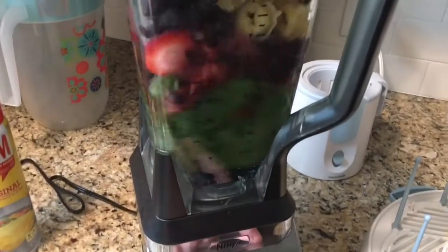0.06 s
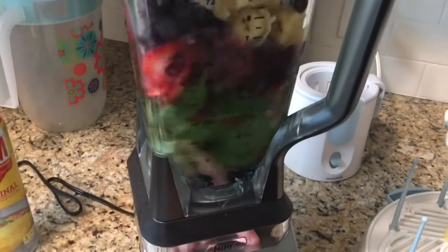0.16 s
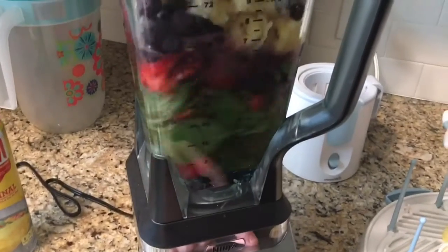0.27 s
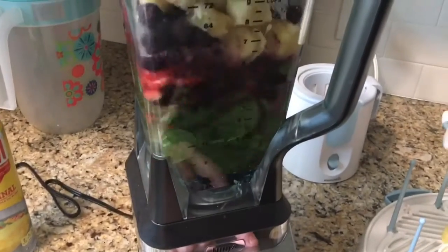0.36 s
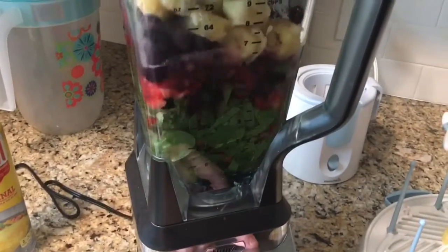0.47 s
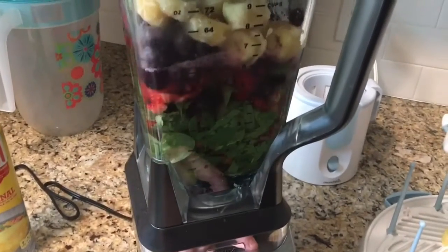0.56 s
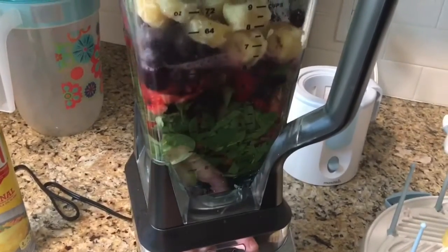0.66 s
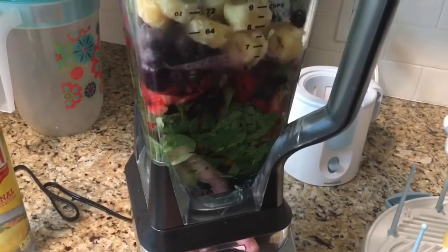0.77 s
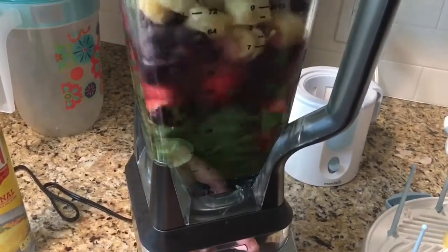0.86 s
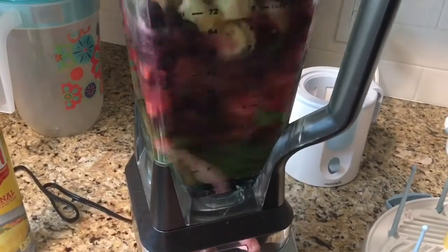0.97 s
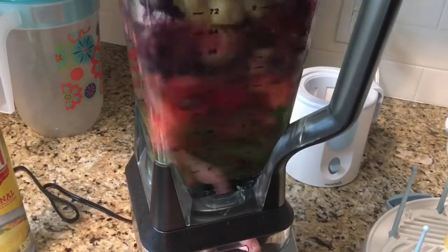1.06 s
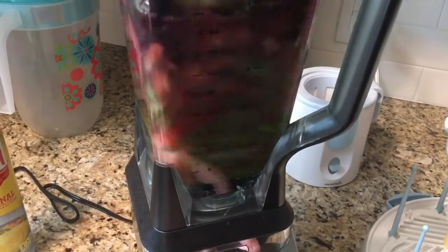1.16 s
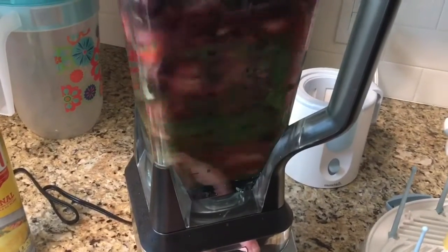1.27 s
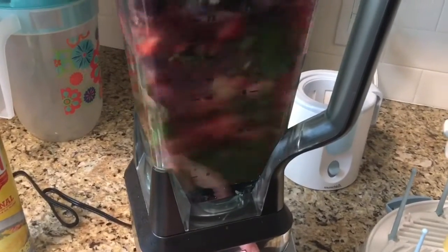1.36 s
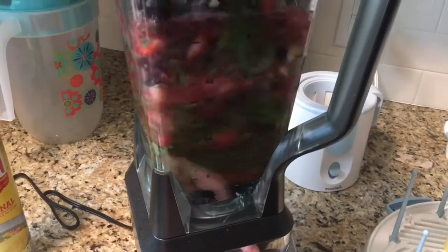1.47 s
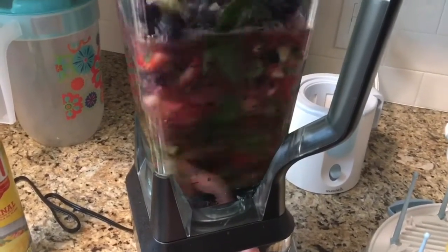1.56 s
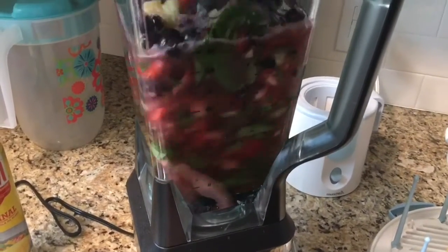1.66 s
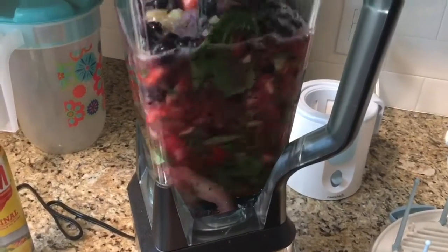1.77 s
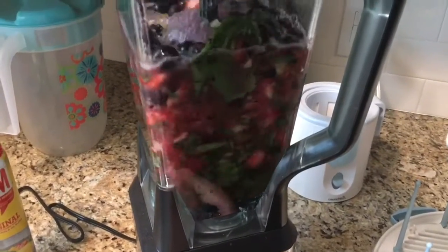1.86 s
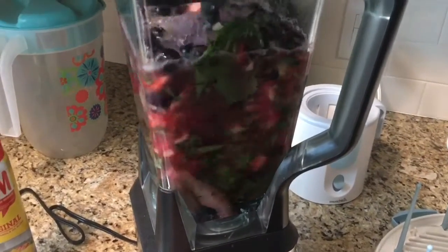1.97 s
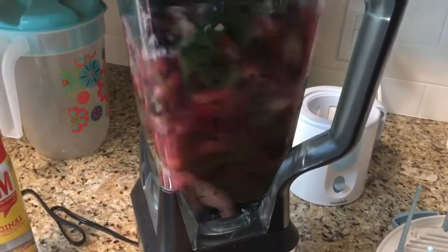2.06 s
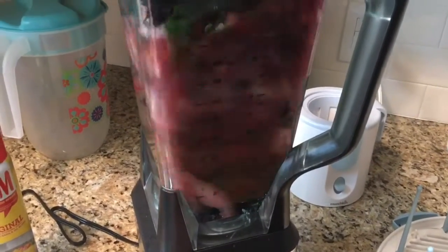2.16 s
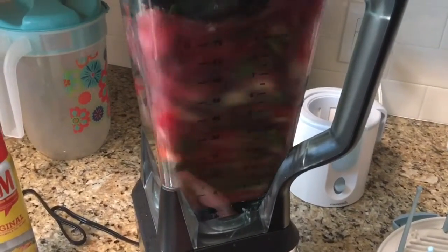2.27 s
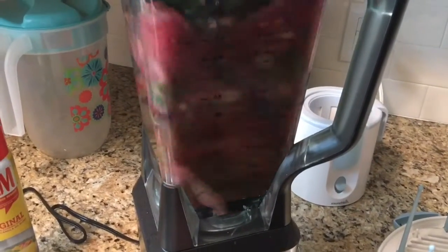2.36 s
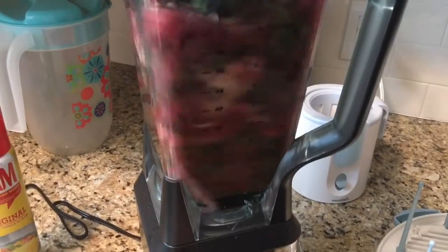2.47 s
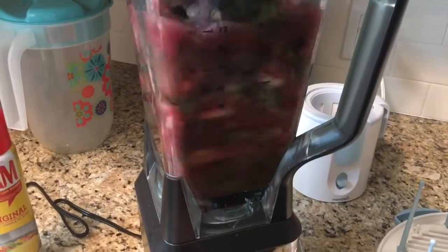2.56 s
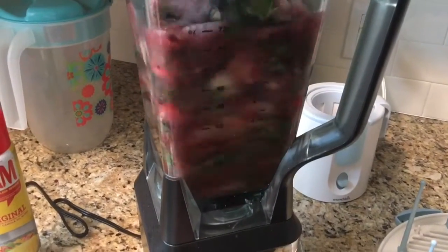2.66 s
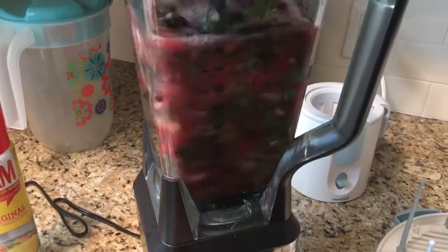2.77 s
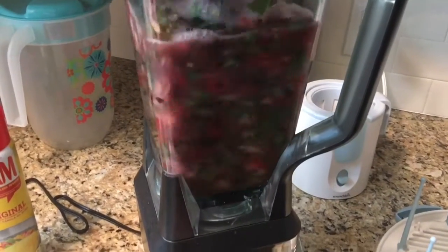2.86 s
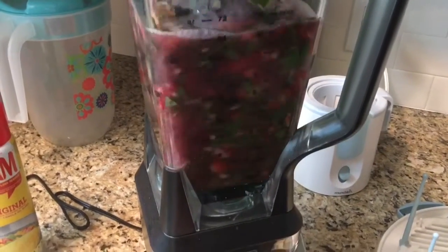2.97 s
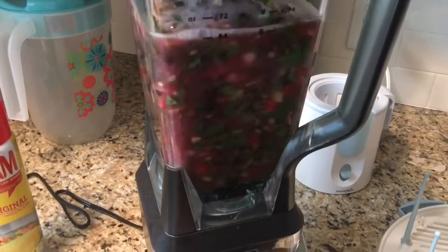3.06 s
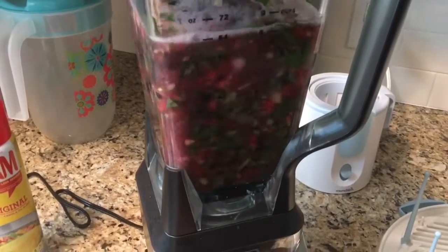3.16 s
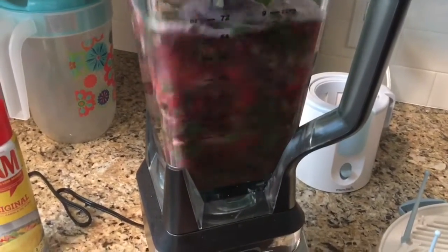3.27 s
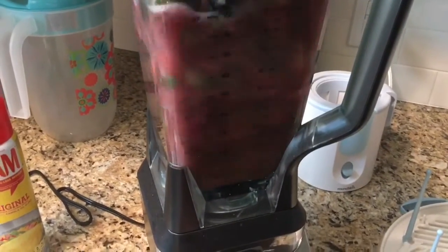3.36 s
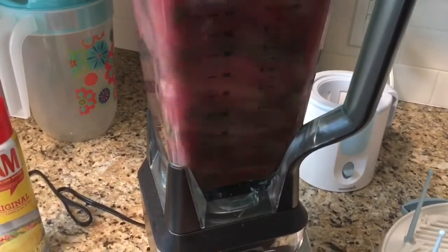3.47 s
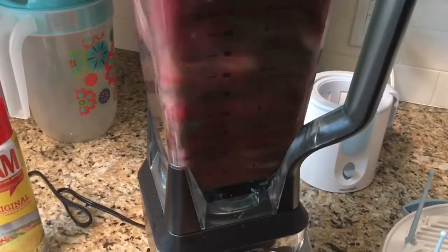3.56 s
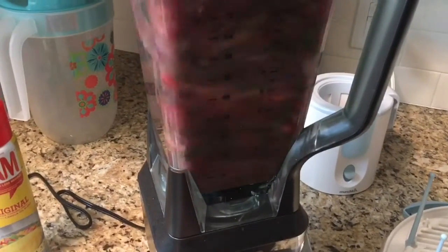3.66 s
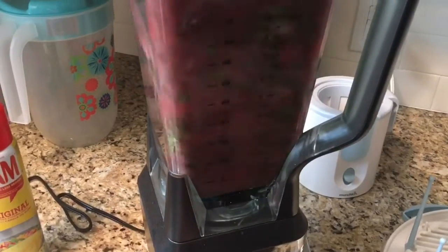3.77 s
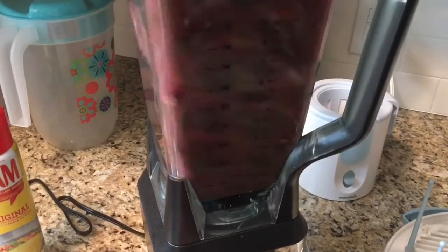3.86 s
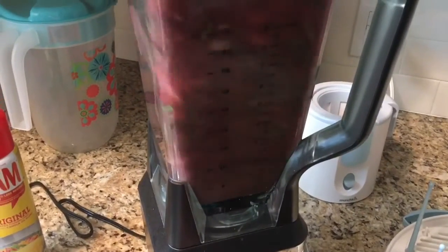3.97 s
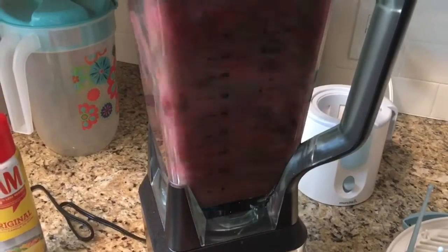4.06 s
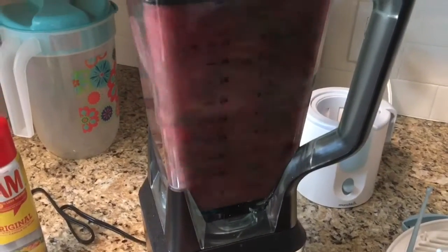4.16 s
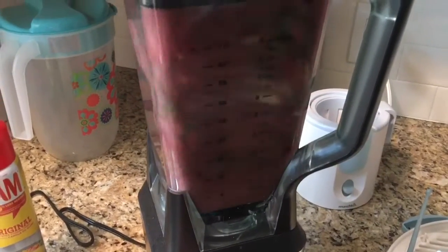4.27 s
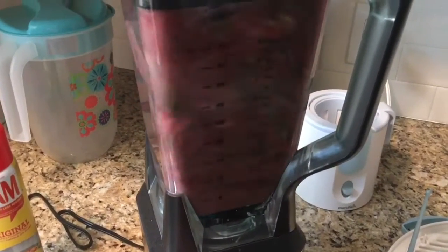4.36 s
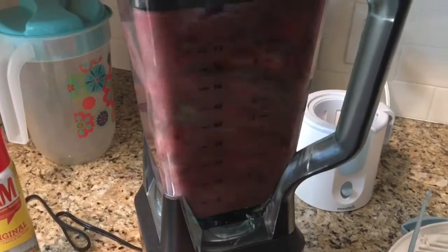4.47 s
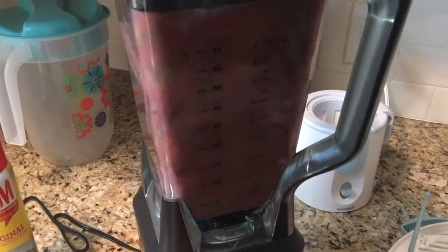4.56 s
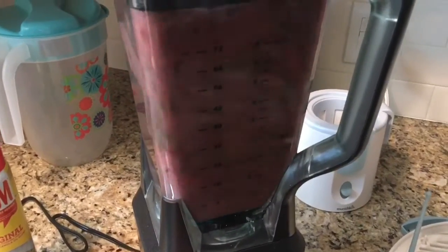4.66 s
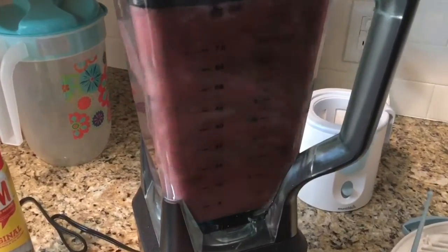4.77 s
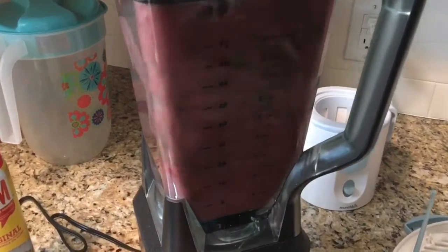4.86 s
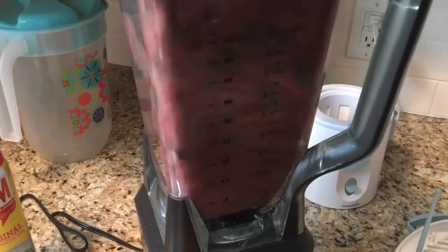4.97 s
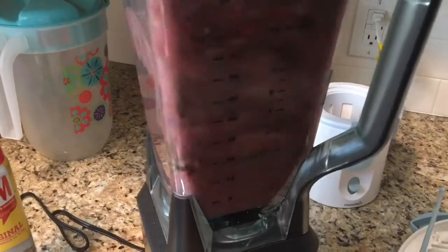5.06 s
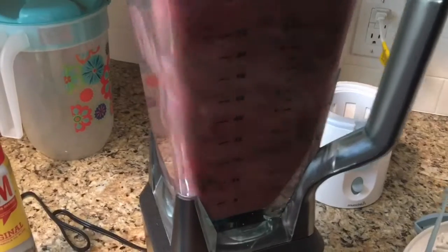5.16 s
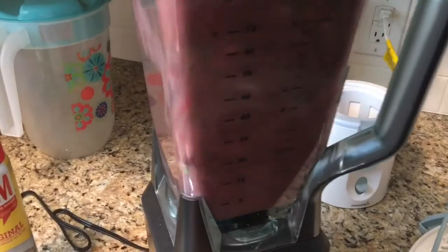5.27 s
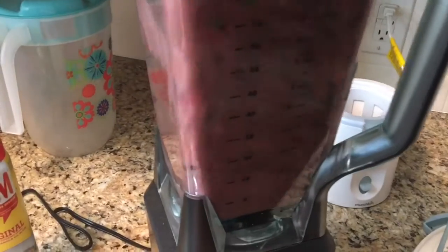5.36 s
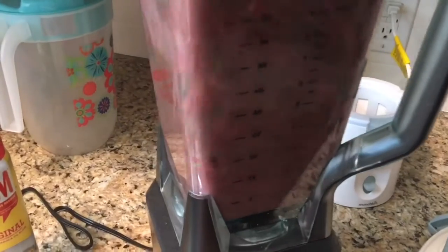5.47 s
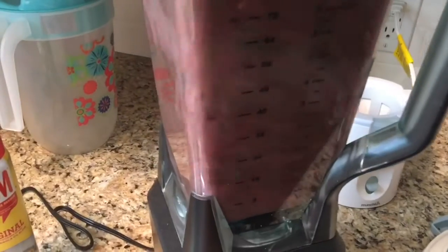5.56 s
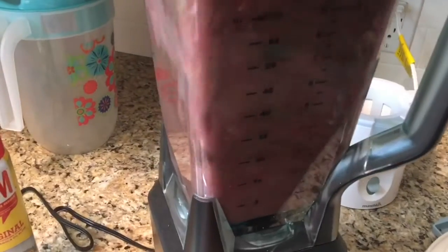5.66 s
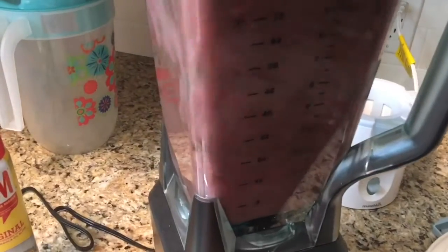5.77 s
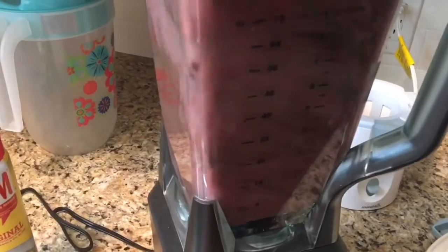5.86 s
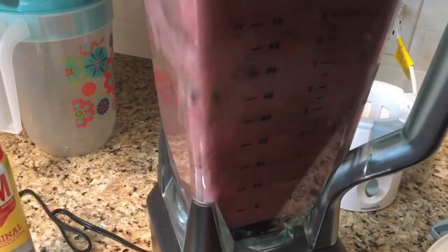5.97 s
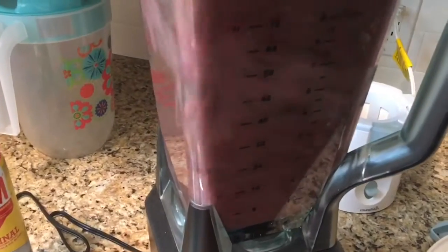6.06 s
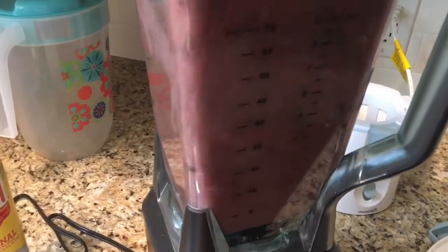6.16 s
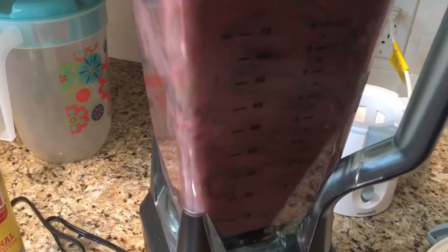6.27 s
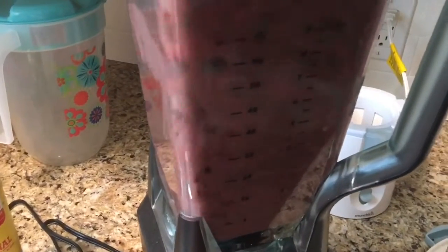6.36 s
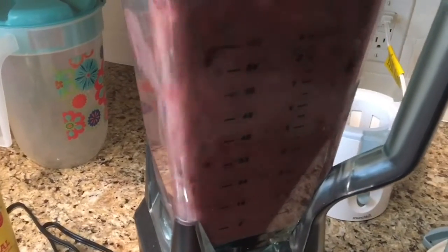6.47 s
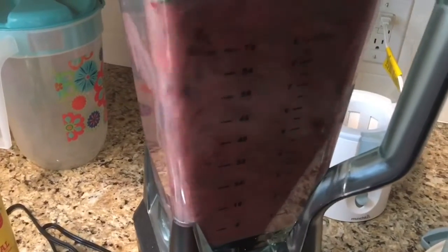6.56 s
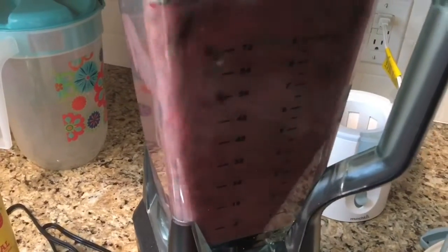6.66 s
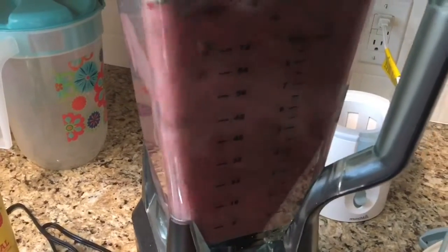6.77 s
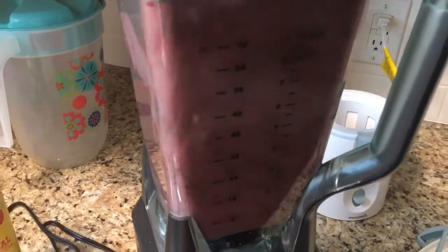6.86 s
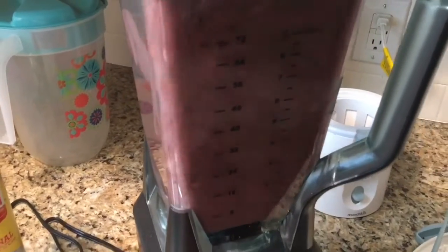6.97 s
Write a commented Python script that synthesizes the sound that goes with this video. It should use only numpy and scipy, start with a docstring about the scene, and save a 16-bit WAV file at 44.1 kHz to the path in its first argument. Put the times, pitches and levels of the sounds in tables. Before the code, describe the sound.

A countertop blender coasts down as hard fruit knocks against its plastic jar. The switch clicks before two more short pulses, each with rasping gears, chopping blades and fruit slumping wetly back. After a last click, the motor climbs into a steady high whine with rushing air and spray, and the pieces churn down to pulp. It is heard close by in a small kitchen, over a faint fridge hum.

```python
"""A countertop blender coasts down from a pulse as hard fruit knocks against the jar. The switch clicks ahead
of two more short pulses; each time the gears rasp, the blades chop and the fruit slumps back. After a last
click, at 3.2 s, the motor climbs into a steady run: the planetary gear whines through the ringing housing,
air and spray rush, and the pieces churn down to pulp. A fridge hums in the small kitchen throughout."""
import sys
import numpy as np
from scipy import signal
from scipy.fft import rfft, irfft, next_fast_len
from scipy.io import wavfile
from scipy.ndimage import uniform_filter1d, map_coordinates

SR = 44100
rng = np.random.default_rng(int(sys.argv[2]) if len(sys.argv) > 2 else 0)


def bounce(signal):
    """Save signal as a 16-bit WAV file at the path given by the first command-line argument."""
    frames = np.transpose(np.atleast_2d(signal))
    limited = np.clip(frames, -1, 1)
    pcm = np.round(limited * 32767).astype(np.int16)
    wavfile.write(sys.argv[1], SR, pcm)


N = 309132
T = np.arange(N) / SR
RUN_START_S = 3.212

# Presses of the pulse button. Each row: on and off in seconds, braking by the fruit in Hz,
# starting surge in dB, then trims of chop, churn and rush in dB.
PULSES = [(-.25, -.11, 9.7, 28, 0, -1, 1), (.842, 1.035, 6.9, 10.5, -0.5, -1, 0),
          (1.993, 2.14, 6.05, 9.5, -1, -1, 0.5)]
# Whole pieces left in the jar. Each row: time in seconds, share from 0 to 1.
WHOLE_PIECES = [(0, 0.86), (2, 0.94), (3.3, 0.97), (4, 0.26), (4.8, 0.17), (7, 0)]
# Tone of the midrange chop and of the low churn. Each row: frequency in Hz, level in dB.
CHOP_EQ = [(150, -27.5), (400, -4), (600, 5.5), (850, 0.5), (1150, 4.5), (1400, 4), (2000, 0), (2800, -9.5),
           (3600, -4), (6000, -16), (15000, -84)]
CHURN_EQ = [(25, -27), (45, -9), (70, -13), (107, -1.5), (150, -12.5), (205, -0.5), (280, -1), (330, 1),
            (358, 2.5), (390, -2.5), (440, 0.5), (530, -9), (900, -18.5), (3000, -55)]


def shaft():
    """Turns per second: each pulse spins up, then coasts against drag and fruit; the run climbs."""
    # The motor catches, ramps up, the fruit thins. Each row: added speed in Hz, time constant in seconds.
    run_stages = [(13.12, .018), (29.55, .209), (10.26, 1.5)]
    pulse_hz, spin_up_s, coast_s = 45, .07, .463
    speed = np.zeros(N)
    for on, off, brake, *_ in PULSES:
        driven = pulse_hz * (1 - np.exp(-np.clip(T - on, 0, off - on) / spin_up_s))
        drag = np.exp(-np.maximum(T - off, 0) / coast_s)
        speed += np.maximum((driven + brake) * drag - brake, 0)
    age = np.maximum(T - RUN_START_S, 0)
    speed += sum(hz * (1 - np.exp(-age / lag)) for hz, lag in run_stages)
    return np.maximum(speed * (1 + .0015 * wander(T * 5)), 1e-3)  # the load makes the speed waver


def gear_whine(speed, turns):
    """Tones of shaft, gear mesh and motor lock to the rotation and sweep through the housing resonances."""
    orders = [1, 2, 7, 46, 47, 48, 89, 90, 91, 94, 97, 98, 99, 100, 101, 103, 135, 138, 141, 144, 147, 186,
              194, 195, 231, 235, 63.67, 127.34, 152.8]  # Each entry: a tone's cycles per blade turn.
    levels_db = [-46.5, -49, -36, -38.5, -55, -36.5, -47, -47, -58, -35, -39.5, -50, -44.5, -41, -45.5,
                 -46.5, -43, -44.5, -45, -50, -41, -50, -58, -46, -60, -56, -56, -59, -42.5]  # Each entry: that tone's level in dB.
    shaky = turns + 0.00088 * wander(T * 35)  # each cut checks the shaft a little
    shaky += 0.00055 * wander(T * 320)  # play between the teeth blurs the high tones
    whine = 0
    for order, db in zip(orders, levels_db):
        gain = undb(db + housing_db(order * speed) + 3.3 * wander(T * 20))
        whine += gain * np.sqrt(2) * np.sin(2 * np.pi * order * shaky)
    drive_db = np.where(T < RUN_START_S, -2, 4)  # a clean whine needs a steady drive
    return undb(drive_db) * whine * (speed / speed.max()) ** 2.35


def gear_rasp(speed, turns):
    """Whole pieces load the teeth unevenly, spreading a rasp around each harmonic of the mesh."""
    harmonics_db = [-27.5, -33, -29.5, -33.5, -36]  # Each entry: level of one mesh harmonic in dB.
    ring_teeth, pulp_db, chunky_db, coast_db = 47, -5, 3.5, -1.5
    chunky = np.interp(T, *np.transpose(WHOLE_PIECES))
    jolted = turns + 0.0037 * chunky * wander(turns * 9)  # pieces jolt the shaft and smear the mesh
    rasp = 0
    for k, db in enumerate(harmonics_db, 1):
        mesh = 2 * np.pi * k * ring_teeth * jolted
        uneven = turns * (4.5 + 2 * k)
        band = wander(uneven) * np.cos(mesh) + wander(uneven) * np.sin(mesh)
        hz = k * ring_teeth * speed
        radiated = hz ** 4 / (hz ** 4 + 700 ** 4)  # the small housing radiates little bass
        hardness = (speed / speed.max()) ** (0.18 * k)  # slow teeth meet softly: the top fades first
        rasp += radiated * hardness * undb(db + 0.65 * housing_db(hz)) * band
    powered = (T >= RUN_START_S) + sum((T >= on) * (T < off) for on, off, *_ in PULSES)
    coasting = 1 - uniform_filter1d(1. * powered, size=SR // 5)  # motor off: less force on the teeth
    return undb(pulp_db + (chunky_db - pulp_db) * chunky + coast_db * coasting) * rasp


def gears(speed, turns):
    """The planetary gear whines and rasps, falling silent as the shaft coasts to rest."""
    drive = (speed / speed.max()) ** 0.23 * np.clip((speed - 3) / 14, 0, 1)
    return drive * (gear_whine(speed, turns) + gear_rasp(speed, turns))


def blades(speed, turns):
    """Blades cut pieces, churn pulp and fling spray; the cuts get finer and more even as pieces shrink."""
    # Tone of wet pulp and of rushing air and spray. Each row: frequency in Hz, level in dB.
    pulp_eq = [(150, -23.5), (400, -23.5), (650, -0.5), (830, -9), (1030, 0), (1160, -6.5), (1680, -1.5),
               (2150, 2.5), (2450, 3), (3050, -6), (3600, -16.5), (6000, -23.5), (15000, -41)]
    rush_eq = [(1200, -37.5), (2800, 0.5), (3400, -0.5), (4300, 2), (4900, -1), (5600, 3), (6500, -2),
               (7800, -4), (9500, -6.5), (10400, -13.5), (11800, -13), (16000, -21.5)]
    chop_gain, churn_gain, rush_gain = blade_gains(speed)
    chunky = np.interp(T, *np.transpose(WHOLE_PIECES))
    bite_db = (0.27 + 1.09 * chunky) * wander(turns * 3.5)  # each passing blade meets a different load
    cuts = grains(300 + 55 * speed, spread_db=3.5) * undb(1.85 * bite_db)
    spray = grains(800 + 120 * speed, spread_db=4.0) * undb(3.15 * bite_db)
    pieces = colour(cuts + 0.77 * rng.standard_normal(N), CHOP_EQ, housing=0.42)
    pulp = colour(spray + 0.53 * rng.standard_normal(N), pulp_eq, housing=0.52)
    chop = np.sqrt(chunky) * pieces + np.sqrt(1 - chunky) * pulp
    churn = colour(grains(1500 + 20 * speed, spread_db=2.0) * undb(2 * bite_db), CHURN_EQ)
    rush = colour(0.54 * cuts + 0.51 * spray + 0.82 * rng.standard_normal(N), rush_eq, housing=0.53)
    return chop_gain * chop + churn_gain * churn + rush_gain * rush


def blade_gains(speed):
    """Chop, churn and rush grow with speed, surge on biting settled fruit and die as the blades stall."""
    # How each layer follows the shaft. Each lists: base level in dB, dB per doubling of speed,
    # stall speed in Hz, weight of the surge.
    chop = (-21.5, 1.9, 6, 1.0)
    churn = (-22, 3, 5, 1.37)
    rush = (-19.5, 5.5, 9, 0.39)
    full_hz, run_surge_db, surge_s = 52, 7.5, .12
    surge_db, trims_db = np.zeros(N), np.zeros((3, N))
    for on, _, _, start_db, *trims in PULSES + [(RUN_START_S, None, None, run_surge_db, 0, 0, 0)]:
        since = T >= on
        surge_db[since] = start_db * np.exp(-(T[since] - on) / surge_s)
        trims_db[:, since] = np.array(trims)[:, None]
    doublings = np.log2(speed / full_hz)
    return [undb(db + slope * doublings + weight * surge_db + trim) / (1 + (stall / speed) ** 2)
            for (db, slope, stall, weight), trim in zip((chop, churn, rush), trims_db)]


def knocks():
    """Hard fruit cracks against a blade and thuds into the plastic jar, which rings briefly."""
    # Blade hits. Each row: start in seconds, thud in dB, crack in dB, decay in seconds.
    hits = [(0.065, -16, -7.5, 0.0038), (0.075, -37, -9.5, 0.006), (0.1347, -25, -4, 0.0024),
            (0.204, -27, -13, .004), (0.279, -16, -18, 0.005), (0.358, -25, -21, 0.0058),
            (0.844, -25, -30, 0.0071), (0.87, -26, -11.5, 0.0046), (0.9243, -9, -7.5, 0.0047),
            (0.964, -26, -10, 0.013), (1.033, -7, -10, 0.0042), (1.1139, -21, -16, 0.0028),
            (1.133, -11.5, -30, 0.0041), (1.294, -16, -11, 0.0029), (1.315, -10, -9, 0.0038),
            (1.394, -8.5, -34, .003), (1.427, -20, -22, 0.013), (1.808, -35, -39, 0.02),
            (1.995, -30, -31, .008), (2.035, -11, -12, 0.0059), (2.0946, -8, -9.5, 0.0067),
            (2.123, -21, -10, 0.0046), (2.209, -13.5, -15.5, 0.016), (2.24, -26, -23, .005),
            (2.773, -47, -33, 0.011), (2.85, -36, -41, .008), (3.217, -11.5, -16.5, 0.0085),
            (3.319, -14, -10, .007), (3.357, -19, -11.5, 0.0095), (3.433, -13, -8, .004),
            (3.584, -7, -20, 0.007), (3.639, -10, -26, 0.0036), (3.684, -13, -7, .004),
            (3.747, -8, -13, 0.0098), (3.873, -7.5, -25, .005), (3.96, -10, -21, 0.0054),
            (3.99, -9, -11, .004), (4.081, -6, -27, 0.0051), (4.59, -6, -10, .004),
            (5.214, -7.5, -25, 0.0068), (5.364, -10.5, -25, 0.0053)]
    # Tone of the thud and of the crack. Each row: frequency in Hz, level in dB.
    thud_eq = [(80, -6), (300, -7), (800, -5.5), (1400, -1.5), (2300, -2.5), (2900, -8.5), (5000, -16),
               (16000, -69)]
    crack_eq = [(300, -12), (1200, 3), (2400, 5), (4000, 7), (6300, 1.5), (8500, -0.5), (11000, -7),
                (16000, -26)]
    thud = crack = 0
    for start, thud_db, crack_db, decay in hits:
        # body, first snap and tail
        blow = 0.65 * burst(start, decay) + 0.42 * burst(start, 0.00053) + 0.085 * burst(start, 0.016)
        thud += undb(thud_db) * blow
        crack += undb(crack_db) * blow
    thud *= colour(rng.standard_normal(N), thud_eq, housing=0.2)
    crack *= colour(rng.standard_normal(N), crack_eq, housing=0.25)
    return thud + crack


def slumps():
    """Fruit falls back on the slowing blades in a soft swell: a low slosh and a wet spatter."""
    # Falling fruit. Each row: peak time and width in seconds, slosh in dB, splash in dB.
    falls = [(0.137, 0.032, -21.5, -33), (0.363, 0.029, -42, -34), (1.646, 0.034, -47, -38),
             (2.236, 0.021, -24, -36), (2.595, .025, -31, -32), (2.744, .03, -45, -41),
             (2.892, 0.024, -38, -48)]
    slosh = splash = 0
    for peak, width, slosh_db, splash_db in falls:
        swell = np.exp(-.5 * ((T - peak) / width) ** 2)
        slosh += undb(slosh_db) * swell
        splash += undb(splash_db) * swell
    slosh *= colour(grains(1500, spread_db=1.5), CHURN_EQ)
    splash *= colour(grains(460, spread_db=5.0), CHOP_EQ, housing=0.94)
    return slosh + splash


def plops():
    """Air pockets open in the fruit and ring for a few cycles, bending up a little."""
    # Air pockets. Each row: start in seconds, pitch in Hz, level in dB, decay in seconds.
    pockets = [(1.134, 1570, -21, .007), (1.393, 1500, -13, .005), (2.248, 477, -14, 0.0085),
               (2.699, 930, -21.5, 0.013), (2.751, 1080, -25, .012), (3.577, 1382, -8.5, .008),
               (4.082, 1130, -15, 0.0042)]
    rise_per_s = 3
    out = 0
    for start, hz, db, decay in pockets:
        age = np.clip(T - start, 0, .1)
        cycles = hz * age * (1 + rise_per_s * age / 2)
        out += undb(db) * burst(start, decay) * np.sin(2 * np.pi * cycles)
    return out


def switch():
    """Each click is a short crack that rings the control panel."""
    # Switch clicks. Each row: start in seconds, level in dB, panel ring relative to it in dB.
    clicks = [(0.7256, -35.5, -5.5), (.789, -35.5, -25), (1.8805, -35.5, -6.5), (1.94, -36, -25),
              (3.046, -55, -7), (3.093, -25.5, -18), (3.159, -36, -15)]
    # Tone of the crack. Each row: frequency in Hz, level in dB.
    click_eq = [(200, 6), (700, -13), (1200, 7), (2800, 4), (4200, 0), (6500, 0.5), (9000, -7.5),
                (16000, -24)]
    # Panel modes. Each row: frequency in Hz, level in dB, seconds to fall by 60 dB.
    panel_modes = [(440, 0, 0.14), (1036, 17.5, 0.041), (1320, 17, 0.044), (2060, -1, 0.043),
                   (2220, 5, 0.065), (5960, -6, .051)]
    crack = sum(undb(db) * burst(start, 0.011) for start, db, _ in clicks)
    crack *= colour(rng.standard_normal(N), click_eq, housing=0.33)
    blows = np.zeros(N)
    for start, db, ring_db in clicks:
        blows[int(start * SR)] = undb(db + ring_db)
    t = T[:SR // 4]
    ring = sum(undb(db - 60 * t / t60) * np.sin(2 * np.pi * hz * t) for hz, db, t60 in panel_modes)
    return crack + 0.75 * signal.fftconvolve(blows, ring)[:N]


def room(x, t60, wet_db):
    """Tiles and counter return a short diffuse tail."""
    t = T[:SR // 2]
    tail = rng.standard_normal(len(t)) * undb(-60 * t / t60) * (t > .003)
    return x + undb(wet_db) * signal.fftconvolve(x, tail / np.linalg.norm(tail))[:N]


def kitchen():
    """The fridge hums over quiet room tone."""
    # Fridge partials and the room tone's spectrum. Each row: frequency in Hz, level in dB.
    partials = [(59.2, -66), (118.4, -54), (236.9, -56), (296.1, -70)]
    room_eq = [(15, -30), (25, -1), (75, 3), (167, -21), (224, -5), (438, -9), (604, -12.5), (811, -18),
               (879, -19.5), (2020, -27.5), (2630, -32), (15000, -48)]
    hum = sum(undb(db) * np.sqrt(2) * np.sin(2 * np.pi * (hz * T + rng.random())) for hz, db in partials)
    return undb(-1.5) * hum + undb(-44) * colour(rng.standard_normal(N), room_eq)


def housing_db(hz):
    """Boost or cut that the resonant motor housing gives a frequency."""
    # Housing resonances. Each row: centre in Hz, width in Hz, gain in dB.
    resonances = [(842, 220, 15.5), (1294, 63, 7), (1510, 51, 6.5), (1950, 61, 4.5), (2090, 40, 7),
                  (2420, 43, 5), (3440, 410, 7), (4210, 114, 7.5), (4537, 53, 9.5), (5067, 51, 10),
                  (5160, 103, 10.5), (6080, 150, 13), (6543, 75, 8.5), (6674, 140, 11), (8480, 380, 6.5),
                  (10050, 180, -6)]
    return sum(db / (1 + (2 * (hz - centre) / width) ** 2) for centre, width, db in resonances)


def colour(x, eq, housing=0):
    """Minimum-phase filter from an EQ curve and a share of the housing resonances; output at rms 1."""
    size = 2 * next_fast_len(N // 2 + 4096)
    hz = np.arange(size // 2 + 1) * SR / size
    eq_hz, eq_db = np.transpose(eq)
    gain_db = np.interp(np.log(hz + 1), np.log(eq_hz), eq_db) + housing * housing_db(hz)
    cepstrum = irfft(np.log(undb(gain_db)))[:size // 2]
    response = np.exp(rfft(2 * cepstrum, size))
    return unit(irfft(rfft(x, size) * response)[:N])


def grains(per_s, spread_db):
    """Random tiny impacts, a few much larger than the rest."""
    sizes = undb(spread_db * np.minimum(rng.exponential(size=N), 4))
    return unit((rng.random(N) < per_s / SR) * sizes * rng.choice([-1, 1], N))


def burst(start, decay):
    """Envelope of a blow: instant attack, exponential fall."""
    age = np.maximum(T - start, 0)
    return (age > 0) * np.exp(-np.minimum(age / decay, 50))


def wander(position):
    """Smooth random drift of spread near 1, with a new value at each whole step of position."""
    steps = rng.standard_normal(int(position.max()) + 2)
    return map_coordinates(steps, [position], order=2, mode="nearest")


def undb(db):
    """Decibels to gain."""
    return 10 ** (np.asarray(db) / 20)


def unit(x):
    """Scale to rms 1."""
    return x / np.sqrt(np.mean(x ** 2))


def scene():
    """One shaft drives gears and blades; jar and switch get the reverb; both channels are alike."""
    speed = shaft()
    turns = np.cumsum(speed) / SR
    gearbox = gears(speed, turns)
    jar = blades(speed, turns) + slumps() + plops() + knocks()
    mono = gearbox + room(jar + switch(), t60=0.3, wet_db=-13.0) + kitchen()
    return np.array([mono, mono])


def record(dry):
    """Roll off the deepest bass, round the highest peaks and cut the top."""
    thin = signal.sosfilt(signal.butter(4, 38, "high", fs=SR, output="sos"), dry)
    rounded = np.tanh(.9 * thin) / .9
    return signal.sosfilt(signal.ellip(10, .1, 70, 15950, fs=SR, output="sos"), rounded)


dry = scene()
out = record(dry)
bounce(out)
```